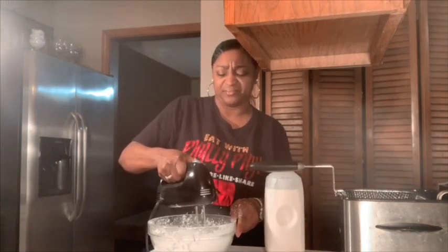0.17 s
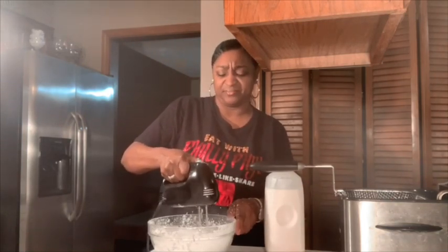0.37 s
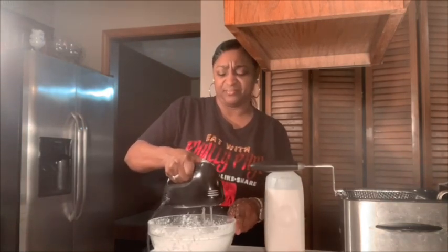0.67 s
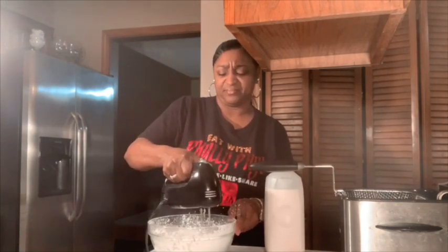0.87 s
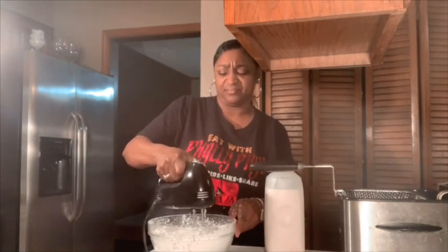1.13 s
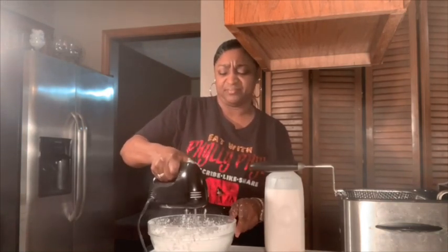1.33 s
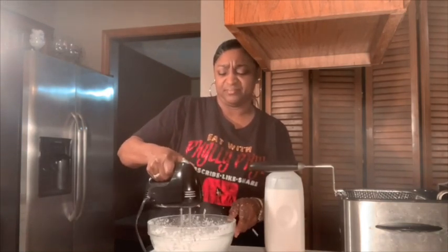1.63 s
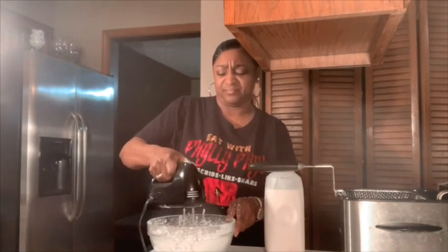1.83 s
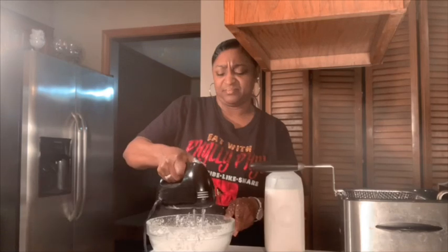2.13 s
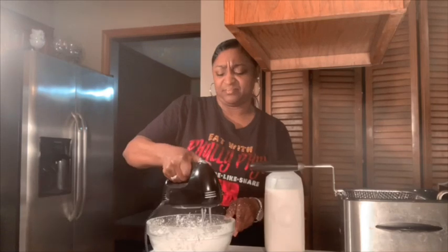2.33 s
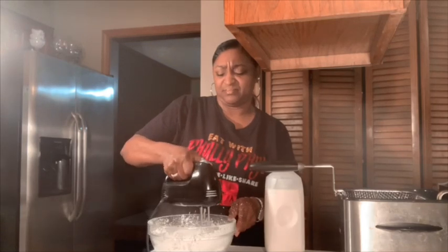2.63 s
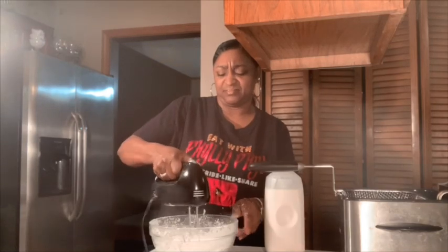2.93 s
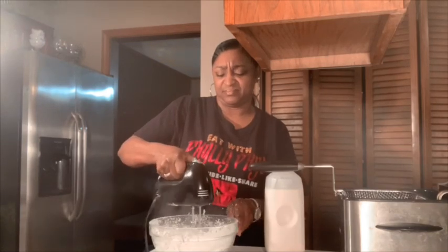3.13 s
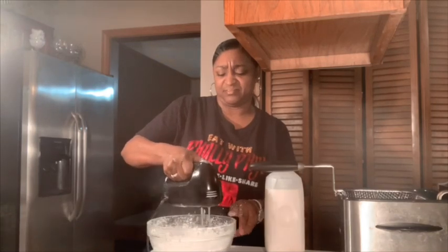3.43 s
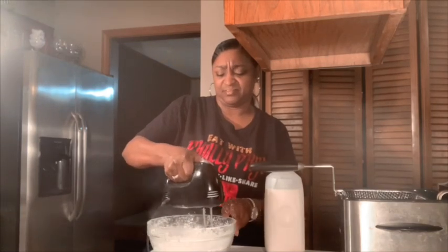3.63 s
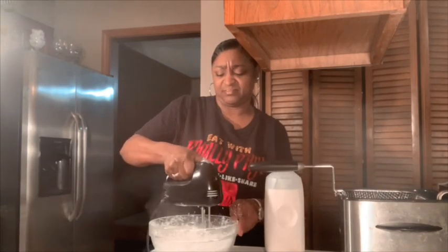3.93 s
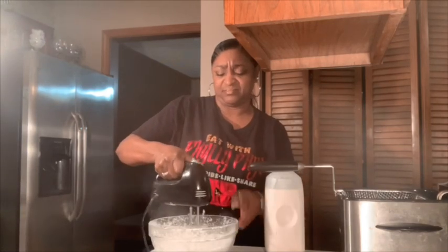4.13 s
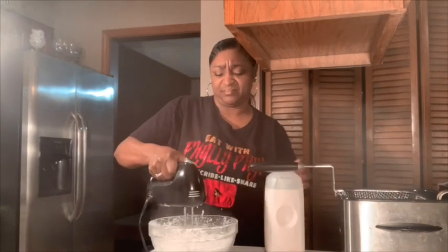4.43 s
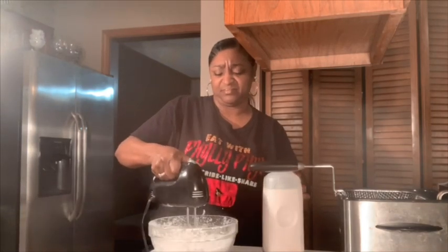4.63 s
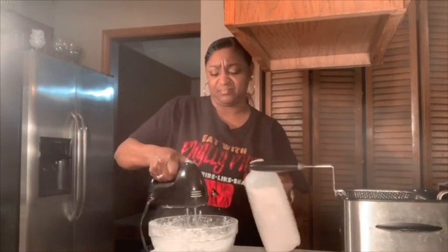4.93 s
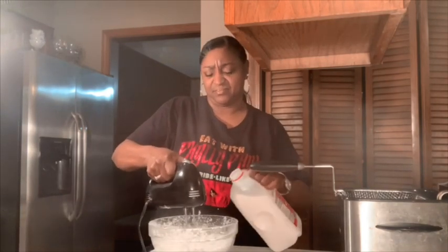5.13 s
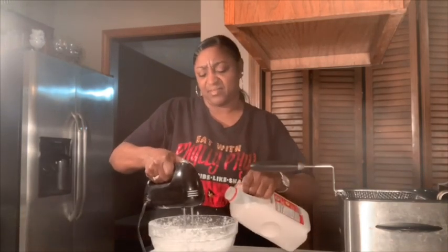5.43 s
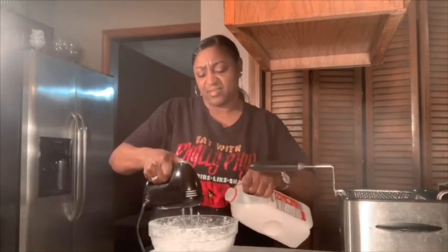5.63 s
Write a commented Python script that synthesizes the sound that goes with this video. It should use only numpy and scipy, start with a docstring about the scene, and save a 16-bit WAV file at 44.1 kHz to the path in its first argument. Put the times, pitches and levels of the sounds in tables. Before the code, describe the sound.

A hand mixer runs throughout, close by in a small kitchen: steady motor whine, thin brush buzz, fan hiss and gear chatter, sagging slightly under thick icing. Beaters knock and rattle on the glass bowl near the start, again just after two seconds, and around three and a half. Later a plastic jug gets one hollow bump. Close stereo microphone with short room echoes.

```python
"""Hand mixer in thick icing

An electric hand mixer whips thick icing in a glass bowl on a kitchen counter, sagging as the icing loads it.
Shaft-locked tones make its motor whine, jittered pulses its brush buzz, and shaped noise the air it blows.
Uneven taps ring its gearbox. Three times the beaters run against the bowl: wire blows ring it and rattle.
Single knocks, glass ticks and wire snaps stand out, and a plastic jug is bumped once, with a lighter second tap."""
import sys
import numpy as np
from scipy import signal
from scipy.fft import rfft, irfft
from scipy.io import wavfile

SR = 44100
rng = np.random.default_rng(int(sys.argv[2]) if len(sys.argv) > 2 else 0)


def to_wav(s):
    """Save 16-bit WAV."""
    ch = np.atleast_2d(s).T  # columns
    pcm = np.round(np.clip(ch, -1, 1) * 32767)  # PCM
    wavfile.write(sys.argv[1], SR, pcm.astype(np.int16))


N = 255383
T = np.arange(N) / SR
HZ = np.fft.rfftfreq(N, 1 / SR)
MAINS_HZ = 60
EDGE_HZ = 15800


def amp(db):
    """Decibels to gain."""
    return 10 ** (np.asarray(db) / 20)


def unit(x):
    """Scales to rms 1."""
    return x / np.sqrt(np.mean(abs(x) ** 2) + 1e-20)


def curve(rows, index=1):
    """One column of a time table at every sample."""
    rows = np.asarray(rows)
    return np.interp(T, rows[:, 0], rows[:, index])


def spectrum(points, hz=HZ):
    """Joins spectrum points on a log-frequency axis."""
    f, value = np.transpose(points)
    return np.interp(np.log(hz + 1), np.log(f + 1), value)


def drift(rate):
    """Smooth chance of rms 1 that changes about rate times a second."""
    return unit(np.interp(T * rate, np.arange(2000), rng.standard_normal(2000)))


def clicks(times, sizes):
    """Impulses of the given sizes at the given times."""
    samples = np.round(np.asarray(times) * SR).astype(int)
    return np.bincount(np.clip(samples, 0, N - 1), sizes, N)


def ring(modes, order=10):
    """Response of a set of damped modes to one blow, peak 1; little radiates below the lowest mode."""
    t = T[:SR // 3]
    wave = 0
    for hz, width, db in modes:
        wave = wave + amp(db) * np.exp(-np.pi * width * t) * np.cos(2 * np.pi * hz * t)
    low_cut = signal.butter(order, .9 * modes[0][0], "highpass", fs=SR, output="sos")
    high_cut = signal.butter(2, 1.5 * modes[-1][0], fs=SR, output="sos")
    wave = signal.sosfilt(high_cut, signal.sosfilt(low_cut, wave))
    return wave / abs(wave).max()


def crack(points, size=2048):
    """The shortest causal click with the given spectrum, peak 1."""
    log_gain = np.log(amp(spectrum(points, abs(np.fft.fftfreq(size, 1 / SR)))))
    wave = np.fft.ifft(np.exp(np.conj(signal.hilbert(log_gain)))).real  # minimum phase
    return wave / abs(wave).max()


def kitchen(x, response, wet_db, t60):
    """Blows x ring a response; returns the head-on sound with its echoes, and the echoes from the sides."""
    t = T[:SR // 2]
    sparse = rng.random((2, len(t))) < 1 / 10
    taps = rng.standard_normal((2, len(t))) * sparse * (t > .001)
    taps = taps * np.exp(-np.log(1000) * t / t60)  # 60 dB down after t60 seconds
    taps = amp(wet_db) * taps / np.linalg.norm(taps[0])
    taps[0, 0] = 1  # direct sound
    rung = signal.fftconvolve(x, response)[None, :N]
    return signal.fftconvolve(rung, taps, axes=1)[:, :N]


def steadied(x, seconds):
    """Keeps the fine grain of x and evens its level over the given time."""
    window = np.hanning(round(seconds * SR))
    power = signal.fftconvolve((x ** 2).mean(0), window, "same") / (seconds * SR / 2)
    return x / np.sqrt(abs(power) + 1e-3 * power.mean())


# motor shaft: (time [s], speed [turns/s])
SHAFT_SPEED = [(0.0, 290.6), (0.14, 290.6), (0.28, 287.9), (0.34, 285.0), (0.5, 283.6), (0.6, 280.8),
               (0.88, 280.6), (1.04, 284.2), (1.2, 284.5), (1.3, 280.8), (1.5, 286.5), (1.66, 287.5),
               (1.78, 286.6), (2.0, 287.9), (2.08, 287.1), (2.22, 278.1), (2.38, 275.2), (2.7, 283.9),
               (3.05, 288.8), (3.15, 287.1), (3.29, 288.6), (3.47, 289.1), (3.6, 285.6), (3.81, 283.8),
               (3.98, 287.0), (4.07, 285.6), (4.14, 281.4), (4.43, 286.0), (4.65, 279.6), (4.79, 284.9),
               (4.93, 287.6), (5.15, 287.7), (5.31, 285.2), (5.79, 285.2)]


def shaft():
    """Adds up the shaft speed into turns; the speed sags as the icing loads the motor."""
    return np.cumsum(curve(SHAFT_SPEED)) / SR


# armature slot whine: (time [s], level before its gain [dB])
SLOT_SWELL = [(0, -45), (.1, -35), (.2, -46), (.36, -41), (.6, -44), (.72, -41), (.78, -47), (.95, -42),
              (1.16, -43), (1.44, -41), (1.72, -47), (1.85, -42), (2.14, -40), (2.3, -48), (2.44, -47),
              (2.52, -38), (2.59, -47), (2.66, -37), (2.85, -49), (3.0, -42), (3.3, -37), (3.55, -40),
              (3.65, -32), (3.8, -40), (4.0, -39), (4.25, -51), (4.39, -42), (4.55, -45), (4.75, -47),
              (4.85, -43), (5.05, -50), (5.4, -46), (5.79, -47)]
# its sideband, twice the mains higher: (time [s], level before its gain [dB])
SIDEBAND_SWELL = [(0.0, -50), (0.1, -46), (0.26, -54), (0.72, -53), (0.84, -47), (1.18, -44), (1.32, -49),
                  (1.4, -43), (1.62, -45), (1.8, -42), (1.96, -41), (2.14, -43), (2.2, -53), (2.4, -40),
                  (2.5, -52), (2.66, -43), (2.74, -55), (3.2, -46), (3.4, -53), (4.4, -54), (4.95, -47),
                  (5.3, -53), (5.79, -52)]
# commutator whine: (time [s], level before its gain [dB])
COMMUTATOR_SWELL = [(0.0, -46), (0.56, -42), (0.66, -47), (0.76, -36), (0.86, -45), (0.92, -37),
                    (0.98, -42), (1.3, -40), (1.42, -47), (1.68, -44), (1.87, -51), (1.96, -41),
                    (2.28, -52), (2.44, -43), (2.6, -47), (2.76, -42), (2.86, -53), (3.0, -43), (3.13, -52),
                    (3.25, -41), (3.55, -49), (3.82, -35), (4.02, -52), (4.16, -42), (4.4, -46),
                    (4.57, -38), (4.65, -48), (4.71, -39), (4.79, -47), (5.09, -42), (5.22, -51),
                    (5.79, -50)]
# 12 slots, sideband, 24 commutator bars: one column (multiple of the shaft rate [ratio])
WHINE_ORDERS = [12, 12.42, 24]
# same three whines: one column (gain [dB])
WHINE_GAINS = [-4, -2.5, -3.5]


def whines(fade_db=1.85, fades_per_s=22):
    """The three whines as (multiple, dB over time): they swell as the mixer is moved about, and waver by chance."""
    swells = (SLOT_SWELL, SIDEBAND_SWELL, COMMUTATOR_SWELL)
    tones = []
    for multiple, gain_db, swell in zip(WHINE_ORDERS, WHINE_GAINS, swells):
        level_db = gain_db + curve(swell) + fade_db * drift(fades_per_s)
        tones.append((multiple, level_db))
    return tones


# tones of the motor at shaft multiples, with mains sidebands beside some of them:
# (multiple of the shaft rate [ratio], level [dB])
MOTOR_TONES = [(1, -44.5), (2, -47.5), (2.42, -57), (3, -58), (3.42, -53), (3.58, -60), (4, -54.5),
               (4.42, -51.5), (4.58, -55), (4.84, -53), (5, -52), (7, -51.5), (8, -54), (9, -51.5),
               (9.42, -58), (10, -52.5), (11, -54.5), (11.58, -55), (13, -58), (14, -57.5), (23.58, -57.5),
               (25, -61), (30, -59), (32, -54), (33, -59), (35, -51), (36, -55), (37, -58), (44, -61)]
FLUTTER, FLUTTERS_PER_S = .45, 20  # greatest depth (ratio to the tone), changes a second


def motor(turns, jitter_turns=0.0037):
    """Tones locked to the shaft; each flutters as the moving mixer shifts its echoes."""
    angle = 2 * np.pi * (turns + jitter_turns * drift(76))
    out = np.zeros((2, N))
    for multiple, db in list(MOTOR_TONES) + whines():
        phase = multiple * angle + 2 * np.pi * rng.random()
        cos, sin = amp(db) * np.cos(phase), amp(db) * np.sin(phase)
        depth = FLUTTER * min(1, np.sqrt(multiple / 6))  # long waves are disturbed less
        a, b, c, d = (depth * drift(FLUTTERS_PER_S) for _ in range(4))
        front = (1 + a) * cos + b * sin
        side = (1 + c) * sin + d * cos
        out += np.array([front, side]) / np.sqrt(.5 + depth ** 2)
    return out


# buzz of the brushes: (frequency [Hz], relative level [dB])
BUZZ_COLOUR = [(250, 22), (1500, 10), (4000, 2), (6000, 10), (9000, -30), (11000, -26), (15000, -34)]


def brushes(turns, brush_db=-51.0, jitter_turns=0.0012, overtones=54):
    """The brushes catch on one high bar each turn: jittered pulses of equal overtones, coloured to a thin buzz."""
    half_angle = np.pi * ((turns + jitter_turns * drift(70)) % 1) + 1e-9
    pulses = np.sin((2 * overtones + 1) * half_angle) / np.sin(half_angle) - 1
    return amp(brush_db) * unit(kitchen(pulses, crack(BUZZ_COLOUR), wet_db=-13, t60=0.12))


# rush of fan and brushes before the housing: (frequency [Hz], density [dB per Hz])
AIR_RUSH = [(25, -86), (40, -90), (62, -69), (105, -78), (250, -79), (400, -77.5), (900, -76), (1800, -75),
            (2900, -75), (4000, -78), (5900, -85), (7500, -90.5), (9900, -77), (11500, -82.5),
            (15500, -87.5)]
# plastic housing resonances: (frequency [Hz], width [Hz], boost [dB])
HOUSING_MODES = [(664, 103, 10.7), (1320, 236, 7.3), (1950, 306, 6.4), (2270, 180, 3.1), (2820, 240, 3.5),
                 (3380, 120, 2.7), (3950, 164, 6.9), (5030, 400, 3.3), (6950, 1040, 9.5), (13300, 440, 3.5)]


def air(turns, air_db=0, mains_depth=0.02, shaft_depth=0.036, beater_depth=0.015, grit_db=1.32):
    """Fan rush and brush hiss, pulsing with the mains, the shaft and the beaters, coloured by the housing."""
    pulsing = 1 + mains_depth * np.cos(2 * np.pi * 2 * MAINS_HZ * T)  # twice the mains rate
    pulsing = pulsing + shaft_depth * np.cos(2 * np.pi * turns)
    pulsing = pulsing + beater_depth * np.cos(2 * np.pi * turns / 10)  # twice a beater turn
    swell_db = .35 * drift(10)
    noise = unit(rng.standard_normal((2, N)) * pulsing * amp(swell_db + grit_db * drift(300)))
    colour_db = spectrum(AIR_RUSH)
    for hz, width, db in HOUSING_MODES:
        colour_db = colour_db + db * .5 ** ((2 * (HZ - hz) / width) ** 2)
    return irfft(rfft(noise) * amp(colour_db + air_db) * np.sqrt(SR / 2), N)


# gearbox resonances: (frequency [Hz], width [Hz], relative level [dB])
GEARBOX_MODES = [(1380, 50, 3.5), (2065.5, 16.7, -1), (2497, 67, -2), (2900, 64, -2.5), (3430, 41, -3),
                 (4030, 58, -6)]
TURNS_PER_TAP, TAP_SCATTER_S, TAP_UNEVEN_DB = 2.5, .0012, 3.5


def gears(turns, gear_db=-43):
    """The worm gears chatter in their play: an uneven tap for every few shaft turns rings the gearbox."""
    taps = T[1:][np.diff(np.floor(turns / TURNS_PER_TAP)) > 0]
    late, force = rng.standard_normal((2000, 2))[:len(taps)].T
    blows = clicks(taps + TAP_SCATTER_S * late, amp(TAP_UNEVEN_DB * force))
    return amp(gear_db) * unit(kitchen(blows, ring(GEARBOX_MODES, order=4), wet_db=3.5, t60=0.42))


# the beaters lean on the bowl; levels are before the drum and clatter trims:
# (start [s], length [s], push on the bowl [dB], rattle on the glass [dB])
LEANS = [(0.0, 0.23, -33.5, -35), (0.207, 0.35, -32, -38.5), (0.457, 0.2, -24.5, -34.5),
         (2.025, 0.1, -28.5, -30), (2.112, 0.18, -24, -28.5), (2.39, 0.059, -34, -34.5),
         (3.398, 0.2, -23, -29), (3.592, 0.29, -33.5, -31), (3.932, .08, -36.5, -39.5)]


def contact(levels_db, attack_s, release_s):
    """Strength of the beaters' contact: each lean rises, holds and dies away."""
    power = np.zeros(N)
    for (start, length, _, _), db in zip(LEANS, levels_db):
        rise = np.clip((T - start) / attack_s, 0, 1)
        fall = np.exp(-np.maximum(T - start - length, 0) / release_s)
        power += (amp(db) * rise * fall) ** 2
    return np.sqrt(power)


# filled bowl on the counter: (frequency [Hz], width [Hz], relative level [dB])
BOWL_MODES = [(134, 8.9, 1), (147.2, 9.3, -2), (178.4, 13.6, -9), (232, 15, -18), (258.5, 6, -11.5)]
# wire on glass damped by icing: (frequency [Hz], relative level [dB])
CLATTER_COLOUR = [(30, -26), (70, -9), (110, -17), (340, -8.5), (440, 7), (570, -1), (720, 4.5),
                  (930, -1.2), (1380, -2.8), (1900, -13), (3500, -14), (6000, -19.5), (9000, -16.5),
                  (12000, -20.5), (16000, -35)]
PUSH_ATTACK_S, PUSH_RELEASE_S = 0.063, 0.13  # the weight builds up and eases off slowly
RATTLE_ATTACK_S, RATTLE_RELEASE_S = 0.04, 0.061  # the wires touch and clear the glass sooner


def beaters(turns, drum_db=-2, churn_db=-42.5, churn_swing_db=1.8, clatter_db=0.5, scatter_s=.0028,
            uneven_db=3.5, scrape=0.082, throb_db=1.4, hum_db=-11):
    """Eight wires pass the glass in each beater turn (20 of the shaft); each strikes off time, then scrapes."""
    beater_turns = turns / 20
    passes = T[1:][np.diff(np.floor(beater_turns * 8)) > 0]
    late, force = rng.standard_normal((800, 2))[:len(passes)].T
    blows = clicks(passes + scatter_s * late, amp(uneven_db * force))
    scrape_decay = np.exp(-1 / (0.0057 * SR))  # time constant 5.7 ms
    sliding = signal.lfilter([1], [1, -scrape_decay], blows) * rng.standard_normal(N)
    drum = steadied(kitchen(blows, ring(BOWL_MODES), wet_db=-11, t60=.2), seconds=.05)
    clatter = kitchen(blows + scrape * sliding, crack(CLATTER_COLOUR), wet_db=6.0, t60=0.19)
    clatter = steadied(clatter, seconds=0.19)
    _, _, push_levels, rattle_levels = np.transpose(LEANS)
    push = contact(push_levels + drum_db, PUSH_ATTACK_S, PUSH_RELEASE_S)
    touch = contact(rattle_levels + clatter_db, RATTLE_ATTACK_S, RATTLE_RELEASE_S)
    churn = amp(churn_db + churn_swing_db * drift(9.8))  # the lumpy icing alone keeps the bowl humming
    throb = unit(amp(throb_db * np.cos(2 * np.pi * beater_turns)))  # one side of a beater leans harder
    # pressed beaters pass the shaft's shaking into the bowl
    hum = amp(hum_db) * unit(drift(25) * np.cos(2 * np.pi * turns))
    return (drum * np.hypot(push, churn) + hum * push) * throb + clatter * touch


# single heavy blows of a beater, before the trims:
# (time [s], thud of the bowl [dB], clack on the glass [dB])
HEAVY_BLOWS = [(0.286, -18, -40), (0.487, -19, -34), (0.549, -17, -24), (0.612, -12, -32),
               (0.655, -21, -25), (0.684, -15.5, -23), (0.773, -18.5, -40), (0.842, -37, -43),
               (1.599, -21.5, -48), (2.13, -14, -14), (2.16, -19, -23), (2.205, -21, -17),
               (2.231, -17, -23), (2.264, -31, -20), (2.28, -35, -29), (2.334, -17, -20.5),
               (2.428, -18, -33), (2.451, -31, -28), (2.481, -29, -22.5), (3.391, -20.5, -18.5),
               (3.424, -24, -36), (3.445, -17, -34), (3.468, -14, -23), (3.507, -15, -21),
               (3.559, -32, -23), (3.579, -23, -25), (3.603, -19, -16), (3.635, -24, -20),
               (3.672, -26, -17), (3.724, -26, -14.5), (3.765, -15.5, -17.5), (3.834, -26, -17.5),
               (3.93, -43, -25), (3.989, -20, -25), (4.483, -24, -24), (4.549, -31, -44), (4.623, -29, -44),
               (4.825, -29, -46)]


def knocks(knock_db=-4.5, clack_db=-2):
    """Each heavy blow thuds the modes of the bowl and clacks on the icing-damped glass."""
    times, thud_levels, clack_levels = np.transpose(HEAVY_BLOWS)
    thuds = kitchen(clicks(times, amp(thud_levels + knock_db)), ring(BOWL_MODES), wet_db=-7, t60=0.12)
    clack_blows = clicks(times, amp(clack_levels + clack_db))
    return thuds + kitchen(clack_blows, crack(CLATTER_COLOUR), wet_db=9.5, t60=0.096)


# sharp ticks of wire on bare glass, before the trims:
# (time [s], peak [dB], ring of the glass [dB])
GLASS_TICKS = [(0.489, -25, -32), (0.5024, -20.5, -35), (0.5714, -17, -19.5), (0.5895, -16, -20),
               (0.6125, -27, -32), (2.0558, -19.5, -40), (2.086, -15, -29), (2.108, -19, -35),
               (2.1365, -21, -40), (3.5305, -20.5, -36), (3.738, -20.5, -43), (3.804, -24, -38)]
# the tick itself: (frequency [Hz], relative level [dB])
TICK_SPECTRUM = [(40, -20), (150, 24.5), (500, 9.5), (950, 11.5), (1800, 13.5), (3000, 4.5), (5200, -16),
                 (7000, 2), (9000, 6), (16000, -64)]
# glass wall of the bowl: (frequency [Hz], width [Hz], relative level [dB])
GLASS_MODES = [(1040, 80, -10), (1460, 80, -12), (2900, 200, -6), (4560, 130, 4.5), (4900, 220, -4),
               (5280, 130, 4.5)]


def ticks(tick_db=2, glass_db=2):
    """Wire on bare glass: a short click from each touch, and the glass wall ringing after it."""
    times, tick_levels, glass_levels = np.transpose(GLASS_TICKS)
    touches = kitchen(clicks(times, amp(tick_levels + tick_db)), crack(TICK_SPECTRUM), wet_db=7, t60=0.045)
    glass_blows = clicks(times, amp(glass_levels + glass_db))
    return touches + kitchen(glass_blows, ring(GLASS_MODES), wet_db=2.5, t60=0.3)


# thin snaps of the beater wires: (time [s], peak [dB])
WIRE_SNAPS = [(2.088, -20), (2.134, -19.5), (2.204, -23), (2.246, -26), (2.428, -28), (3.598, -26),
              (3.742, -21)]
# the snap itself: (frequency [Hz], relative level [dB])
SNAP_SPECTRUM = [(1000, -30), (6000, -8.5), (10500, 7), (13000, 1), (16000, -7)]


def snaps(snap_db=0):
    """Thin, high clicks of the beater wires, with a brief spray of echoes."""
    times, levels = np.transpose(WIRE_SNAPS)
    return kitchen(clicks(times, amp(levels + snap_db)), crack(SNAP_SPECTRUM), wet_db=9.5, t60=0.079)


# bump on the jug and its lighter second tap: (time [s], peak [dB])
JUG_BUMPS = [(4.411, -20.5), (4.441, -32)]
# plastic jug: (frequency [Hz], width [Hz], relative level [dB])
JUG_MODES = [(375, 16, -6), (590, 36, 1), (645, 17, 3), (720, 9, -8), (780, 16, -4), (1310, 45, -8)]


def jug():
    """A bump sets the damped modes of the plastic jug ringing."""
    times, levels = np.transpose(JUG_BUMPS)
    return kitchen(clicks(times, amp(levels)), ring(JUG_MODES), wet_db=-1, t60=0.5)


# likeness of the two ports: (frequency [Hz], likeness [0-1])
PORT_LIKENESS = [(60, .97), (150, .97), (280, .8), (550, .35), (1400, .4), (2200, .15), (3900, .55),
                 (5500, .2), (6600, .3), (7600, .95), (8600, .995), (9700, .93), (11500, .45), (13000, .99)]
# phase by which left leads: (frequency [Hz], lead [radians])
LEFT_LEAD = [(50, 0), (450, -.3), (700, .6), (1500, -.8), (3300, .2), (5200, -.5), (6500, .7), (7300, 2.9),
             (9400, 3.2), (10900, 4.1), (11900, 5.5), (13000, 6.28)]
# level of left over right: (frequency [Hz], difference [dB])
LEFT_OVER_RIGHT = [(60, -0.5), (125, -1.8), (200, 4), (380, -2.3), (700, -1.5), (1290, -0.9), (2380, -2),
                   (4400, -1.2), (8120, 0), (15000, 0)]


def microphone_ports(sound):
    """Head-on sound is shared by the ports, sideways sound opposed, before left-right level and phase offsets."""
    front, side = rfft(sound)
    same = np.clip(spectrum(PORT_LIKENESS), -1, 1)
    front = front * np.sqrt((1 + same) / 2)
    side = side * np.sqrt((1 - same) / 2)
    tilt = amp(spectrum(LEFT_OVER_RIGHT) / 2)
    left = (front + side) * tilt
    right = (front - side) / tilt * np.exp(-1j * spectrum(LEFT_LEAD))
    return irfft(np.array([left, right]), N)


def scene():
    """The shaft drives the mixer and its beaters; timed hits join in, and two microphone ports hear it all."""
    turns = shaft()
    mixer = motor(turns) + brushes(turns) + air(turns) + gears(turns)
    hits = knocks() + ticks() + snaps() + jug()
    return microphone_ports(mixer + beaters(turns) + hits)


def record(dry):
    """Band limit: a steep linear-phase low-pass closes off the top treble."""
    low_pass = signal.firwin(511, EDGE_HZ, window=("kaiser", 9), fs=SR)
    return signal.oaconvolve(dry, low_pass[None], "same")


dry = scene()
out = record(dry)
to_wav(out)
```